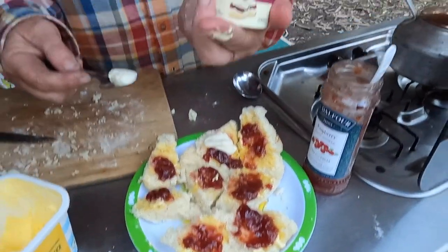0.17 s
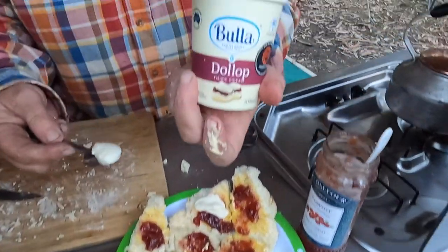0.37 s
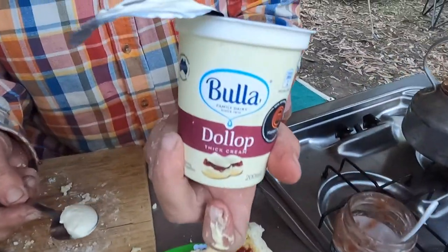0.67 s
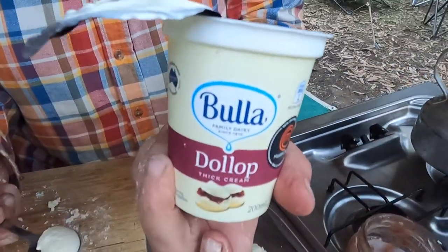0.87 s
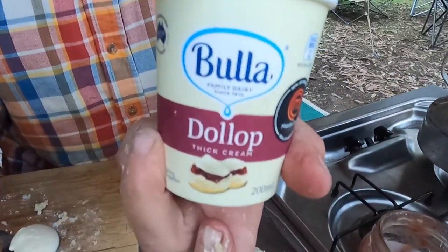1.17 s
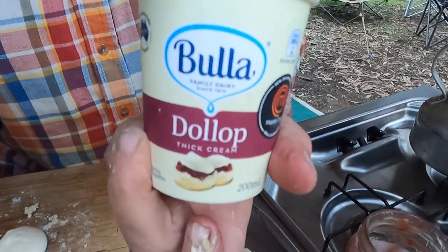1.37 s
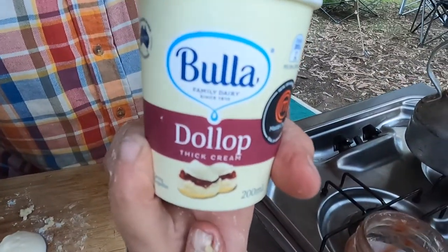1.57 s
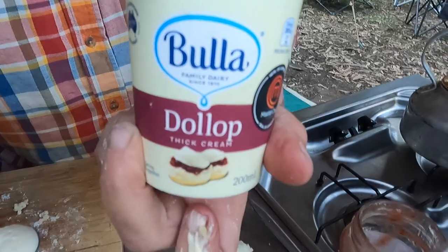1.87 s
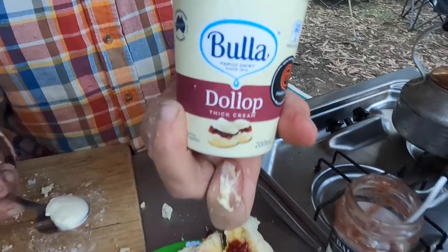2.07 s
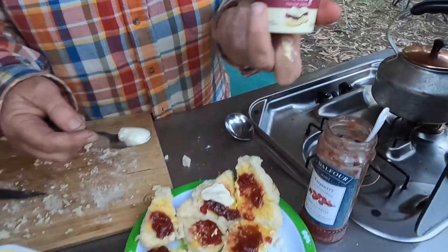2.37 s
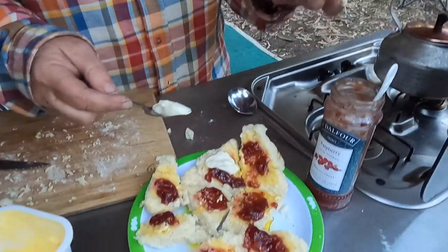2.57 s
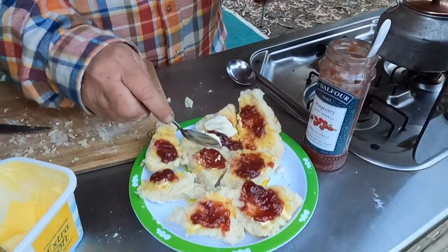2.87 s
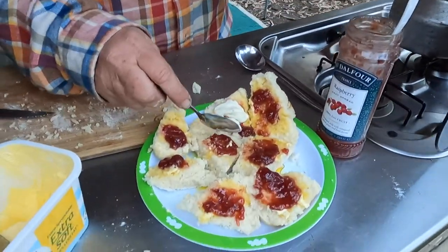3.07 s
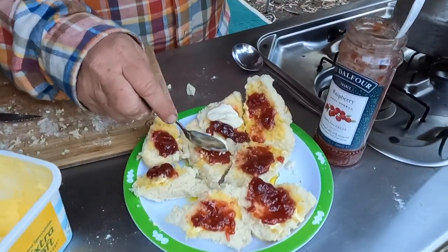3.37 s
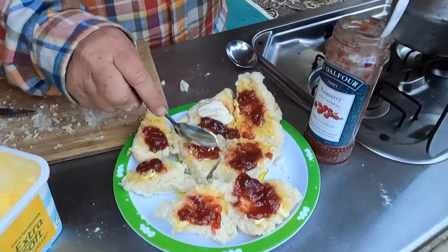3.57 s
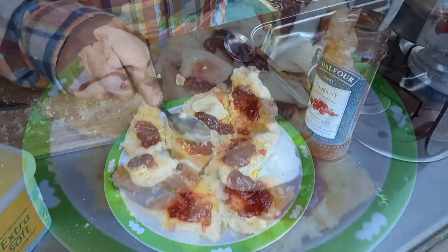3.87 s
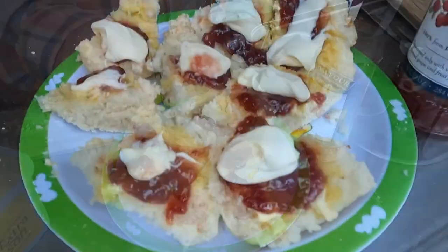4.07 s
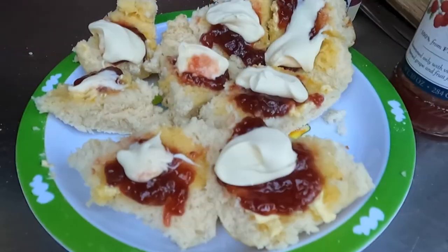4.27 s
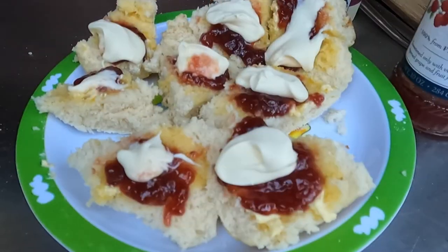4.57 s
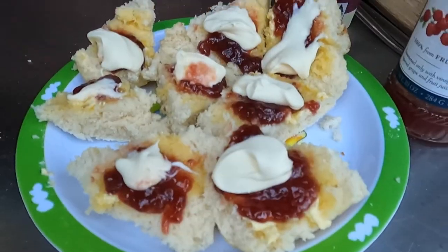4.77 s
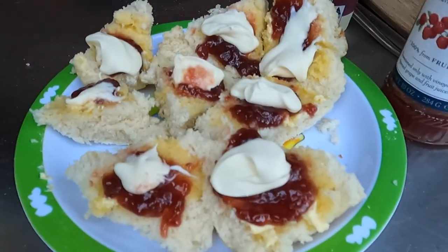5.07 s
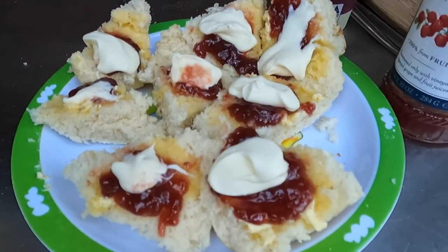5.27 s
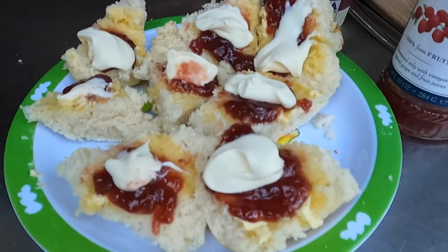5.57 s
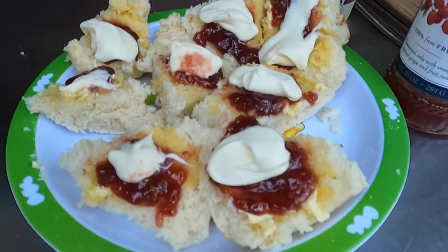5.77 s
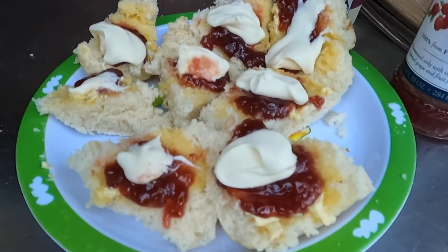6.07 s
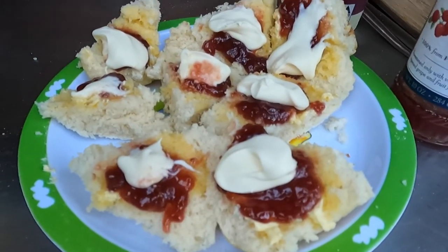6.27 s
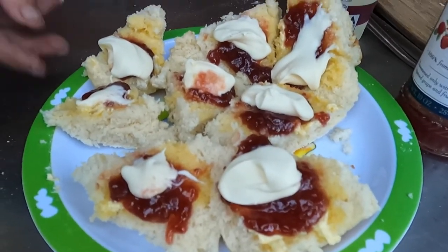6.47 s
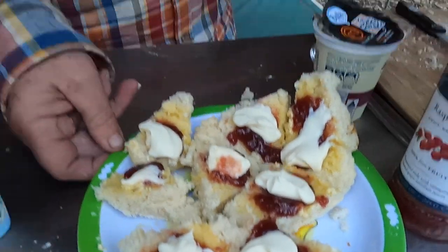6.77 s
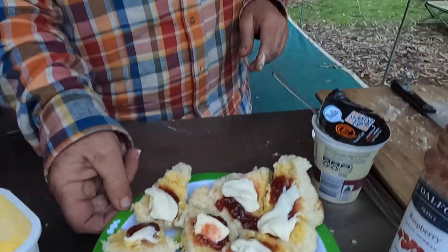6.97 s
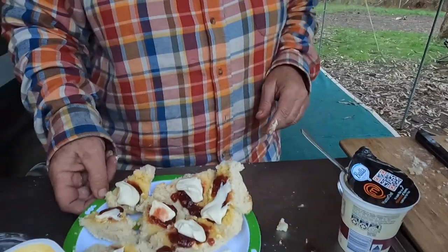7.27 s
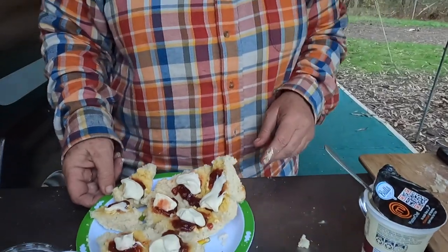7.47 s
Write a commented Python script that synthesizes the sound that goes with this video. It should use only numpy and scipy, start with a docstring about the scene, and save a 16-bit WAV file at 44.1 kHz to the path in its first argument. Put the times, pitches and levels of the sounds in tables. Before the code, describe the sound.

Outdoors at a camp table, close microphone. A faint dull handling rustle opens over soft hiss, with a few tiny high bird chirps. After a long quiet stretch, faint taps lead to a cluster of loud hollow plastic knocks with woody thuds and small rubs. A spoon then clinks and bounces, light touches follow, and finally a tub drags roughly over the gritty top.

```python
"""Setting a camp table

Kitchen things are set down on a camp table outdoors: a tub knocks, a spoon clinks and bounces, and small
rubs come in between. These are noise bursts and dying tones. At last a plastic tub is dragged over the
gritty table top, made of many tiny random slips sent through resonances. Behind it lie a rustle of
handling at the start, a few thin, high bird calls (sliding tones) and a soft hiss (filtered noise)."""
import sys
import numpy as np
from scipy import signal
from scipy.io import wavfile
from scipy.ndimage import uniform_filter1d

SR = 44100
rng = np.random.default_rng(int(sys.argv[2]) if len(sys.argv) > 2 else 0)


def to_wav(sig):
    """Store sig (one row per channel, or 1-D mono) as 16-bit WAV at the path in sys.argv[1].

    Samples outside -1..1 are clipped; the rate is SR.
    """
    pcm = np.clip(np.atleast_2d(sig), -1, 1) * 32767
    pcm = np.round(pcm).astype(np.int16)
    wavfile.write(sys.argv[1], SR, pcm.T)  # frames by channels


N = 336924
TAIL = np.arange(SR // 2) / SR  # half a second of time for dying sounds, in s

# All levels in the event tables are relative: each source adds its own gain.
# Hard things set down on the table: start_s, clack_level_db, thud_level_db, thud_pitch_hz,
# skid (no unit: 0 is a square blow, 1 a glancing one)
KNOCKS = [(3.135, -57, -44, 550, 1), (3.624, -35, -49, 500, 0.25), (3.653, -42, -57, 500, 0.18),
          (3.703, -37.5, -54, 500, 0.089), (3.935, -29.5, -40.5, 259, 1), (3.955, -40, -67, 261, 0.94),
          (4.220, -15, -24.5, 420, 0.031), (4.2469, -9, -17.5, 460, 0.18), (4.254, -6.5, -19.5, 523, 0.98),
          (4.485, -7.5, -29.5, 597, 0.27), (4.553, -14, -22, 520, 0.047), (4.566, -6, -24, 484, 0.33),
          (4.641, -32, -26.5, 334, 1), (4.824, -22.5, -22, 415, 0.0025), (5.994, -40, -38.5, 100, 0.42),
          (6.033, -37, -24.5, 436, 0.43), (6.674, -32.5, -32.5, 224, 1), (6.874, -55, -60, 122, 0.016)]
# The spoon lands and bounces: start_s, ring_level_db, thud_level_db, thud_pitch_hz
SPOON_LANDINGS = [(5.8066, -8, -21.5, 445), (5.8496, -13, -30.5, 420), (5.873, -24.5, -50, 600)]
# Short rubs: start_s, length_s, level_db
RUBS = [(3.36, 0.043, -43.5), (3.398, .03, -41.5), (4.303, 0.025, -22.5), (4.391, 0.037, -30.5),
        (4.445, 0.13, -34), (4.495, 0.038, -31), (4.507, 0.048, -21), (4.611, 0.02, -26),
        (4.693, 0.021, -25), (4.734, 0.025, -30), (4.758, 0.036, -33), (4.87, 0.063, -41.5),
        (6.004, 0.034, -42), (6.065, 0.063, -44.5), (6.684, 0.042, -32.5), (6.764, .078, -38.5),
        (6.826, 0.17, -41)]
# How hard the dragged tub grinds on the table: time_s, friction_db
DRAG_FRICTION = [(6.972, -33.5), (7.0, -19.5), (7.045, -20.5), (7.06, -23.5), (7.15, -22), (7.255, -23.5),
                 (7.31, -19.5), (7.38, -26.5), (7.52, -27.5), (7.595, -27), (7.64, -33)]
# The tub's rim catches on the table: start_s, level_db
RIM_CATCHES = [(7.0247, -9.5), (7.0407, -10), (7.086, -8.5), (7.097, -10), (7.1904, -7.5), (7.269, -5.5),
               (7.3016, -5.5), (7.3167, -10), (7.5941, -14.5)]
# The tub's base bumps on the table: start_s, rumble_level_db
BASE_BUMPS = [(6.977, -28), (7.271, -26), (7.324, -25.5), (7.575, -31.5)]
# Bird calls: start_s, first_pitch_hz, last_pitch_hz, level_db
BIRD_CALLS = [(.74, 8600, 7300, -60), (.897, 8100, 7600, -63), (1.07, 7400, 8150, -65),
              (1.17, 7000, 8000, -62.5), (1.321, 5400, 8000, -54), (1.49, 7600, 7300, -56),
              (2.437, 8600, 7400, -59), (2.608, 8150, 6700, -62), (2.8, 8100, 6400, -64),
              (5.419, 7360, 6200, -57.5), (5.495, 5500, 6300, -58), (5.594, 7700, 6800, -62)]

# Ringing tones (modes) of the table, the tub and the spoon: pitch_hz, level_db, time_to_fall_60_db_s
TABLE_MODES = [(79.6, -25, 0.42), (115, -18, 0.33), (145, 0, 0.3), (171.8, -4.5, 0.31), (251, -7.5, 0.35),
               (295, -5, 0.14), (348, 7, 0.1), (421, 4, 0.068), (489.4, 3, 0.092), (542.5, -4, 0.23),
               (589, 7, 0.073), (710, -51, 0.038), (862, -1.5, 0.13), (1080, -16.5, 0.086)]
TUB_MODES = [(1100, -4, 0.031), (1187, -6, 0.047), (1280, 4, 0.037), (1524, -24.5, 0.071),
             (1960, -5, 0.047), (2063, -19, 0.089), (2370, -13, 0.044), (2520, -5.5, 0.065),
             (2775, -26, 0.04), (3260, -21, 0.32), (4590, -37, 0.15)]
SPOON_MODES = [(858, -8, 0.099), (1100, -7, 0.047), (1398, -8, 0.096), (2027, -4.5, 0.086),
               (2176, 8, 0.036), (3160, 0.5, 0.029), (3260, -1.5, 0.03), (3960, -7, 0.037),
               (4290, -9, 0.033), (5098, -6, 0.034), (5640, -30, 0.033), (7300, -24, 0.028),
               (10500, -22, 0.024)]

# Resonances of the dragged tub: pitch_hz, width_hz, boost_db
TUB_SHELL = [(1193, 60, 9), (1960, 115, 11.5), (2614, 93, 9.5), (3140, 160, 5.5), (3780, 430, 6.5),
             (4560, 170, 7.5), (5700, 290, 13.5), (6930, 370, 9)]
# Fine ringing of the table top under friction: pitch_hz, width_hz, boost_db
TABLE_SHEEN = [(2800, 16, -5.5), (2734, 44, 9), (3200, 20, -18), (3370, 100, 0), (3670, 29, 8),
               (3820, 57, -0.5), (4580, 64, 5), (5370, 35, 10)]

# Tone colours, from the boom of the table to the outdoor hiss: pitch_hz, level_db (per Hz)
THUD_COLOUR = [(30, -36), (80, -29), (140, 6.5), (400, 3.5), (600, -1.5), (900, 0), (1500, 1), (4000, -60)]
CLACK_COLOUR = [(100, -11), (500, -26), (1000, -1), (2000, 3), (2900, 4), (3900, -0.5), (5200, -16.5),
                (8000, -98), (16000, -54)]
TICK_COLOUR = [(1000, -1), (4000, 1), (5200, 1.5), (7000, -8.5), (8800, -19.5), (11000, -16.5),
               (13500, -34), (16000, -21)]
RUB_COLOUR = [(60, -3), (300, 12), (700, 5), (1300, 6), (2200, 5), (3400, 2), (5200, -4), (7000, -15),
              (8800, -27), (11000, -20), (14000, -44)]
GRIT_COLOUR = [(60, -43), (300, -14.5), (800, -10.5), (1500, 1), (3000, 4.5), (4500, 0.5), (5300, -9),
               (7400, -15.5), (8800, -18.5), (10900, -16), (13000, -32), (14500, -57)]
SNAP_COLOUR = [(100, -37), (500, -10.5), (1200, 4.5), (2400, 7.5), (4600, 4.5), (5800, -10), (7400, -24),
               (11000, -22.5), (14500, -37)]
RUMBLE_COLOUR = [(30, -38), (100, -24), (170, -7.5), (350, 1.5), (750, 4.5), (1200, 2), (3000, -34)]
HISS_COLOUR = [(25, -27), (60, -56), (95, -40), (130, -19), (165, -3.5), (330, 0.5), (550, -0.5), (930, -3),
               (2130, -3.5), (3680, -10), (6200, -20.5), (8500, -34.5), (11300, -38.5), (15000, -67)]
# More tone colours, for handling, the nearby echo and the left-right difference: pitch_hz, level_db
HANDLING_COLOUR = [(25, -28.0), (80, -25), (200, -12.0), (500, -5.5), (1500, -37)]
BOOM_COLOUR = [(60, -5.5), (140, 7), (450, 5.5), (900, -2), (2500, -9)]
SIZZLE_COLOUR = [(300, -25), (1000, 6), (3500, -1.5), (7000, -2), (10000, -12)]
SIDE_COLOUR = [(100, -59), (7000, -69), (9000, -34), (10500, -21), (13000, 0)]

# A skid has a blunter crack, a brighter tick and a longer rattle than a square blow
CRACK_DB, SKID_CRACK_DB = 16.5, -15
TICK_DB, SKID_TICK_DB = -38, 17.5
CLACK_T60_S, SKID_T60_S = .055, .035
RING_DB, SKID_RING_DB, RING_RISE_S = -9, -9.5, .0004
# A light rub is brightest near RUB_HZ; a firmer one is brightest lower down
RUB_HZ, LIGHT_RUB_DB, RUB_DB_PER_OCTAVE = 3650, -33.5, 24
# dB gained per dB of friction above the usual, below and above the split
USUAL_FRICTION_DB, BODY_FOLLOWS, BRIGHT_FOLLOWS, EDGE_OF_BODY_HZ = -26, 1.07, 0.98, 4900
BUMP_RISE_S, BUMP_DECAY_S = 0.0035, 0.024
# The handling rustle fades slowly, then stops
HANDLING_DB, HANDLING_FADE_DB_PER_S, HANDLING_S, HANDLING_RELEASE_S = -45, 20, 0.35, 0.12
# A level call is long and warbles deeply; both shrink as the call slides further
CALL_S, WARBLE_DEPTH_HZ, SLIDE_SCALE_HZ = .12, 270, 1900
# Low calls are richer in overtones
PURE_HZ, OVERTONE_DB, OVERTONE_DB_PER_OCTAVE = 7550, -22, 37
# The low wash and high hiss sink together once and stay there
WASH_DB, HISS_DB = -49, -46
SINK_AT_S, SINK_S, SINK_DB = 3.73, 0.17, -3
EDGE_HZ = 14500  # top of the audible band kept at the end


def amp(db):
    """Turns decibels into a gain."""
    return 10 ** (np.asarray(db) / 20)


def evened(x):
    """Scales a sound to an average strength (rms) of 1."""
    return x / np.sqrt(np.mean(x ** 2) + 1e-20)


def struck(x):
    """Scales a blow so that its first 20 ms have rms 1."""
    return x / np.sqrt(np.mean(x[:SR // 50] ** 2) + 1e-20)


def add(mix, s, sound):
    """Mixes a sound in at time s, in seconds."""
    part = mix[max(round(s * SR), 0):][:len(sound)]
    part += sound[:len(part)]


def colour(x, points, peaks=(), size=4096):
    """Filters a sound to a tone colour with resonant peaks, never sounding ahead of its input."""
    hz = abs(np.fft.fftfreq(size, 1 / SR))
    f, points_db = np.transpose(points)
    db = np.interp(np.log(hz + 1), np.log(f), points_db)
    for centre, width, height in peaks:
        db = db + height / (1 + (2 * (hz - centre) / width) ** 2)
    # the Hilbert transform finds the phase that puts the energy as early as possible
    response = np.exp(np.conj(signal.hilbert(np.log(amp(db)))))
    taps = np.fft.ifft(response).real
    return signal.oaconvolve(x, taps[:size // 2])[:len(x)]


def dying(t60):
    """Falls smoothly by 60 dB in t60 seconds."""
    return np.exp(-np.log(1000) * TAIL / max(t60, 1 / 1000))


def burst(t60, crack=0., crack_s=0.0076):
    """Noise with a hard first contact and a dense dying rattle; total energy 1."""
    x = rng.standard_normal(len(TAIL)) * (dying(t60) + crack * dying(crack_s))
    return x / np.linalg.norm(x)


def ring(modes, spread_db, in_step=False):
    """Dying tones, weighed anew by each blow; they start together at full swing, or else from zero."""
    luck = rng.standard_normal(len(modes))
    out = np.zeros(len(TAIL))
    for k, (hz, db, t60) in enumerate(modes):
        # without in_step, every other tone starts downwards
        start = np.pi / 2 if in_step else k * np.pi
        out += amp(db + spread_db * luck[k]) * dying(t60) * np.sin(2 * np.pi * hz * TAIL + start)
    return out


def wander(per_s):
    """Random drift of rms 1 that heads for a new value per_s times a second."""
    knots = rng.standard_normal(N // 20)
    return evened(np.interp(np.arange(N) * per_s / SR, np.arange(len(knots)), knots))


def slips(per_s, spread_db):
    """Friction as a random train of tiny slips of uneven size."""
    size = amp(spread_db * np.minimum(rng.exponential(1, N), 4)) * rng.choice([-1, 1], N)
    return evened(size * (rng.random(N) < per_s / SR))


def thud(hz, dense_db=-3, t60=0.12, rise_s=0.0049, focus_db=5, punch=0.64, punch_s=0.061):
    """The table top answers with low tones over a dense boom, both strongest near hz."""
    def weighted(rows):
        """Weakens rows by their distance from hz in octaves."""
        return [(f, db - focus_db * min(abs(np.log2(f / hz)), 3), *rest) for f, db, *rest in rows]

    tones = struck(ring(weighted(TABLE_MODES), spread_db=3.0, in_step=True))
    boom = struck(colour(burst(t60), weighted(THUD_COLOUR)))
    body = tones + amp(dense_db) * boom
    # the blow is strongest before it has spread through the top and legs
    return struck(body * (1 - np.exp(-TAIL / rise_s)) * (1 + punch * dying(punch_s)))


def knocks(clack_db=-12, thud_db=-1, dull_db_per_octave=-6):
    """Each knock is a clack and a tick at the contact, the ring of the tub and the thud of the table."""
    out = np.zeros(N)
    low_top_hz = TUB_MODES[2][0]
    for s, clack, low, hz, skid in KNOCKS:
        # a square blow rings the tub's low modes; a skid also reaches the upper ones
        dull = dull_db_per_octave * (1 - skid)
        modes = [(f, db + dull * max(np.log2(f / low_top_hz), 0), t60) for f, db, t60 in TUB_MODES]
        t60 = CLACK_T60_S + SKID_T60_S * skid
        crack = amp(CRACK_DB + SKID_CRACK_DB * skid)
        contact = amp(clack_db) * struck(colour(burst(t60, crack, crack_s=0.0093), CLACK_COLOUR))
        tick = struck(colour(burst(t60, crack=0.18), TICK_COLOUR))
        tick *= amp(TICK_DB + SKID_TICK_DB * skid)
        tub = struck(ring(modes, spread_db=3.0) * (1 - np.exp(-TAIL / RING_RISE_S)))
        tub *= amp(RING_DB + SKID_RING_DB * skid)
        add(out, s, amp(clack) * (contact + tick + tub))
        add(out, s, amp(low + thud_db) * thud(hz))
    return out


def spoon(ring_db=-9.0, thud_db=1, tick_db=-16, clack_db=-11, rise_s=0.0012):
    """The spoon's ring is damped at once by what it lands on."""
    out = np.zeros(N)
    for s, db, low, hz in SPOON_LANDINGS:
        metal = struck(ring(SPOON_MODES, spread_db=0.6) * (1 - np.exp(-TAIL / rise_s)))
        tick = amp(tick_db) * struck(colour(burst(0.034, crack=3), TICK_COLOUR))
        clack = amp(clack_db) * struck(colour(burst(0.084), CLACK_COLOUR))
        add(out, s, amp(db + ring_db) * (metal + tick + clack))
        add(out, s, amp(low + thud_db) * thud(hz, dense_db=1.5, t60=0.13, focus_db=13))
    return out


def drag(grit_db=-3.0, rumble_db=-19, bump_db=-2, catch_db=-12, judder_db=0.5, dust_db=-46,
         crackle_db=-9, bright_db=1):
    """Slips over grit drive the tub's shell and the table; now and then the rim catches and snaps free."""
    s, friction = np.transpose(DRAG_FRICTION)
    t = np.arange(N) / SR
    moving = np.clip((t - s[0]) / 0.0035, 0, 1) * amp(judder_db * wander(110))
    friction = np.interp(t, s, friction)

    # the contact wanders between three spots, each with its own fine pattern of resonances
    spots = np.zeros(N)
    for _ in range(3):
        strength = amp(5.1 * wander(22))
        pattern = burst(0.024, crack=9.1, crack_s=0.0012)
        spots += strength * signal.oaconvolve(slips(2200, spread_db=-2.0), pattern)[:N]
    # level out the sum over 25 ms
    spots /= np.sqrt(uniform_filter1d(spots ** 2, SR // 40) + 1e-9)

    # pressing harder feeds the body of the scrape a little more than its bright edge
    grit = evened(colour(spots, GRIT_COLOUR, TUB_SHELL + TABLE_SHEEN))
    body = signal.sosfiltfilt(signal.butter(3, EDGE_OF_BODY_HZ, fs=SR, output="sos"), grit)
    press = friction - USUAL_FRICTION_DB
    scrape = body * amp(BODY_FOLLOWS * press) + (grit - body) * amp(BRIGHT_FOLLOWS * press + bright_db)
    out = scrape * amp(USUAL_FRICTION_DB + grit_db) * moving

    # coarser crumbs crackle under the rim
    crumbs = evened(colour(slips(200, spread_db=4.5), SNAP_COLOUR, TUB_SHELL))
    out += crumbs * amp(friction + crackle_db) * moving

    # the table rumbles with the pressure and swells at each bump
    rumble = amp(friction + rumble_db) * moving
    bump = (1 - np.exp(-TAIL / BUMP_RISE_S)) * np.exp(-TAIL / BUMP_DECAY_S)
    for s, db in BASE_BUMPS:
        add(rumble, s, amp(db + bump_db) * bump)
    out += evened(colour(slips(2700, spread_db=-0.5), RUMBLE_COLOUR)) * rumble

    # the hiss of fine dust follows the pressure only weakly
    dust = evened(colour(slips(9000, spread_db=1.0), TICK_COLOUR, TUB_SHELL))
    out += dust * amp(dust_db + 0.34 * (friction - friction.max())) * moving

    for s, db in RIM_CATCHES:
        snap = colour(burst(0.042, crack=1.9, crack_s=.01), SNAP_COLOUR, TUB_SHELL)
        add(out, s, amp(db + catch_db) * struck(snap))
    return out


def rubs(level_db=-3.5, rise_s=0.0015, peak_db=8, width_hz=1100):
    """Rubs start sharply and ease off; the firmer the rub, the lower and less marked its brightest band."""
    out = np.zeros(N)
    grains = slips(4400, spread_db=2.0)
    for s, length, db in RUBS:
        octaves = max(db - LIGHT_RUB_DB, 0) / RUB_DB_PER_OCTAVE
        bright_band = (RUB_HZ / 2 ** octaves, width_hz, peak_db / (1 + 2 * octaves))
        piece = grains[int(s * SR):][:len(TAIL)]
        tone = evened(colour(piece, RUB_COLOUR, TABLE_SHEEN + [bright_band]))
        shape = (1 - np.exp(-TAIL / rise_s)) * np.exp(-(1.16 * TAIL / length) ** 2)
        add(out, s, amp(db + level_db) * tone * shape)
    return out


def handling(hz=335, width_hz=130, peak_db=16):
    """A dull, hollow rustle of hand and sleeve as the tub is lifted: noise with one low resonance."""
    t = np.arange(N) / SR
    rustle = colour(rng.standard_normal(N), HANDLING_COLOUR, [(hz, width_hz, peak_db)])
    fade = amp(HANDLING_DB - HANDLING_FADE_DB_PER_S * t)
    return evened(rustle) * fade * np.clip(1 - (t - HANDLING_S) / HANDLING_RELEASE_S, 0, 1)


def birds(level_db=1, warble_hz=95, jitter_hz=170):
    """Thin, slightly hoarse whistles that slide quickly, level off, warble and fade."""
    out = np.zeros(N)
    jitter = jitter_hz * wander(900)
    for s, first, last, db in BIRD_CALLS:
        steady = np.exp(-abs(last - first) / SLIDE_SCALE_HZ)
        length = CALL_S * steady
        over = OVERTONE_DB + OVERTONE_DB_PER_OCTAVE * np.log2(2 * PURE_HZ / (first + last))
        u = np.linspace(0, 1, int(length * SR))  # progress through the call
        slide = last + (first - last) * (1 - u) ** 2
        warble = WARBLE_DEPTH_HZ * steady * np.sin(2 * np.pi * (warble_hz * length * u + rng.random()))
        hz = slide + warble + jitter[int(s * SR):][:len(u)]
        phase = 2 * np.pi * np.cumsum(hz) / SR
        # the whistle is the second harmonic of the voice; the third and fourth are weaker
        tone = np.sin(phase) + amp(over) * (np.sin(3 * phase / 2) + .3 * np.sin(2 * phase))
        add(out, s, amp(db + level_db) * tone * signal.windows.tukey(len(u), .5) * amp(6.0 - 10 * u))
    return out


def hiss(low_db=-0.23, high_db=-0.28, split_hz=700):
    """Outdoor air: noise split into a low wash and a higher hiss, both wavering a little."""
    since = np.maximum(np.arange(N) / SR - SINK_AT_S, 0)
    level = SINK_DB * np.minimum(since / SINK_S, 1)
    out = np.zeros(N)
    for kind, db in (("low", WASH_DB + low_db), ("high", HISS_DB + high_db)):
        noise = colour(rng.standard_normal(N), HISS_COLOUR)
        band = signal.sosfilt(signal.butter(3, split_hz, kind, fs=SR, output="sos"), noise)
        out += evened(band) * amp(db + level + .5 * wander(25))
    return out


def surroundings(x, low_db=-16, low_t60=0.62, high_db=-17, high_t60=0.29):
    """The stove and shelter nearby return a faint tail that lasts longest in the bass."""
    boom = colour(burst(low_t60), BOOM_COLOUR)
    sizzle = colour(burst(high_t60), SIZZLE_COLOUR)
    tail = (amp(low_db) * boom + amp(high_db) * sizzle) * (1 - np.exp(-TAIL / 0.0035))
    return x + signal.oaconvolve(x, tail)[:N]


def scene():
    """All sounds come from straight ahead; almost only the highest treble differs between the ears."""
    on_table = knocks() + spoon() + rubs() + drag()
    mid = surroundings(on_table) + birds() + hiss() + handling()
    scattered = signal.oaconvolve(mid, burst(.025))[:N]
    side = colour(scattered, SIDE_COLOUR)
    return np.array([mid + side, mid - side])


def record(dry, notch_hz=9080, notch_width_hz=700, low_cut_hz=55):
    """The microphone loses deep bass, its port cuts a treble notch, and peaks past its limit are clipped."""
    thin = signal.sosfilt(signal.butter(2, low_cut_hz, "high", fs=SR, output="sos"), dry)
    notch = signal.iirnotch(notch_hz, notch_hz / notch_width_hz, fs=SR)
    clipped = np.clip(signal.lfilter(*notch, thin), -.9, .9)
    # last of all, remove what lies above the top of the band
    band_limit = signal.firwin(255, EDGE_HZ, window=("kaiser", 9), fs=SR)
    return signal.oaconvolve(clipped, band_limit[None], "same")


dry = scene()
out = record(dry)
to_wav(out)
```